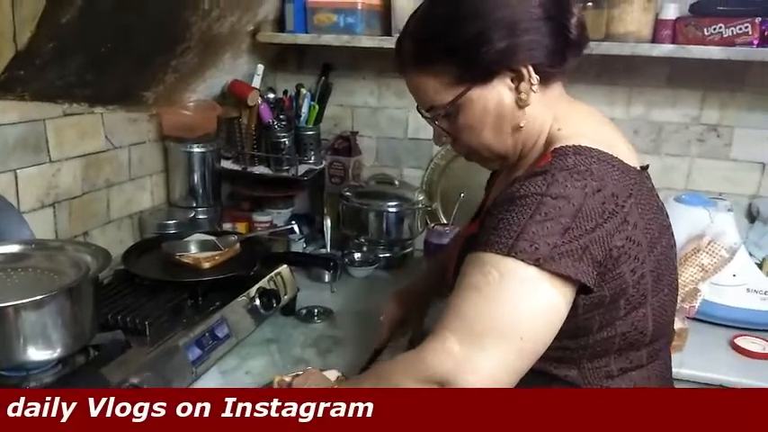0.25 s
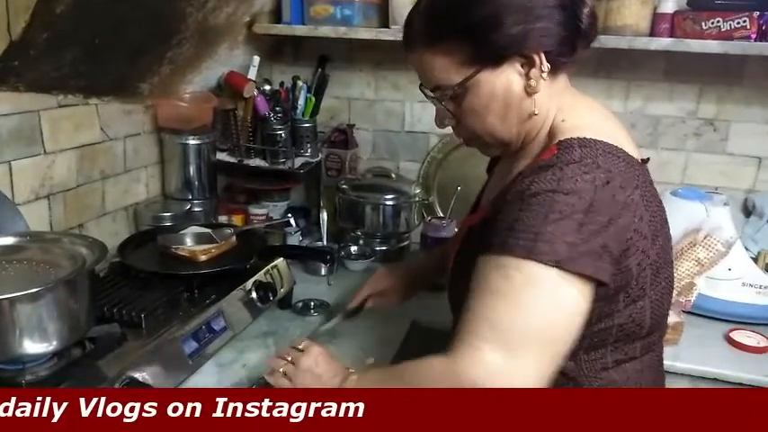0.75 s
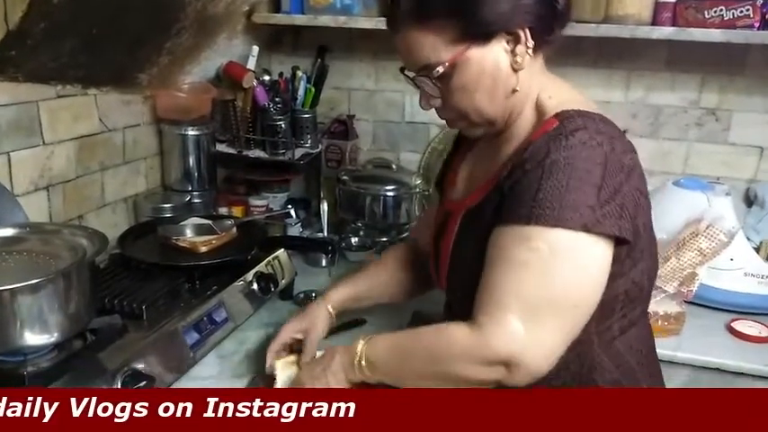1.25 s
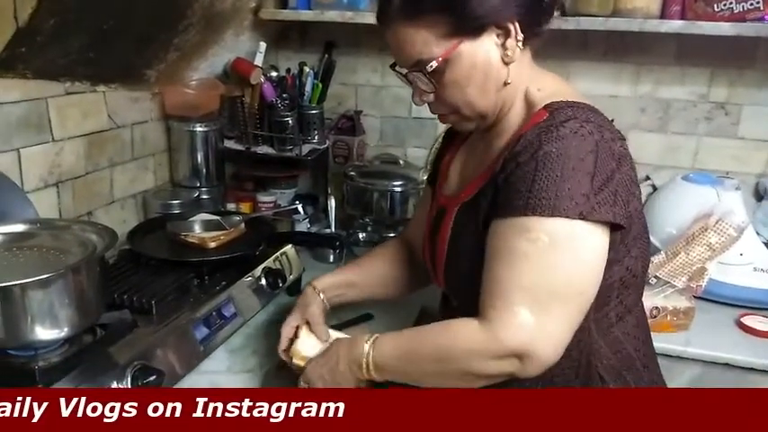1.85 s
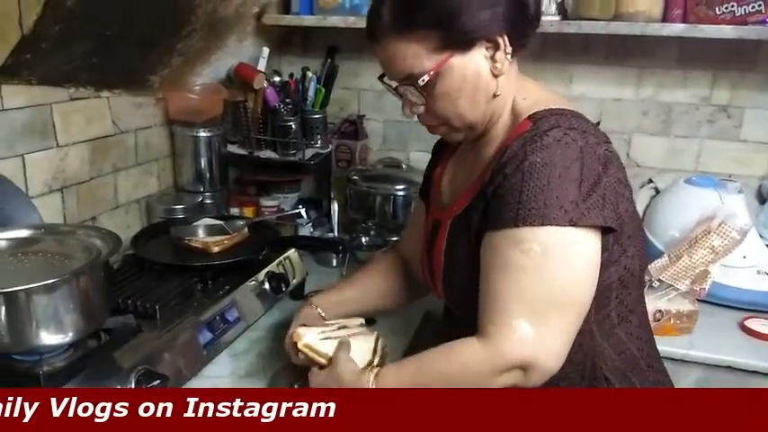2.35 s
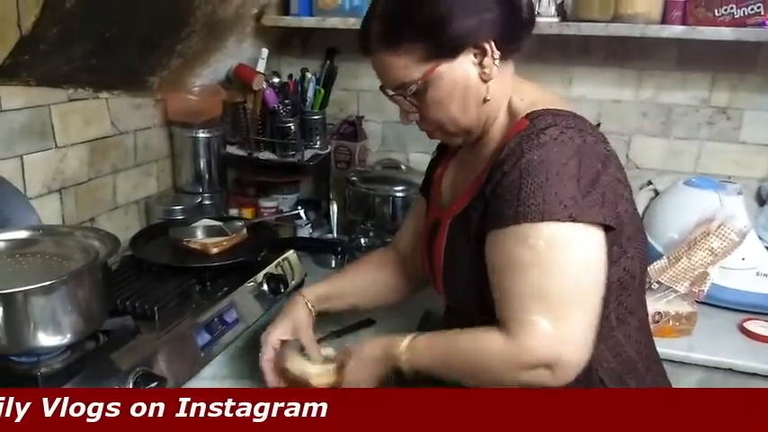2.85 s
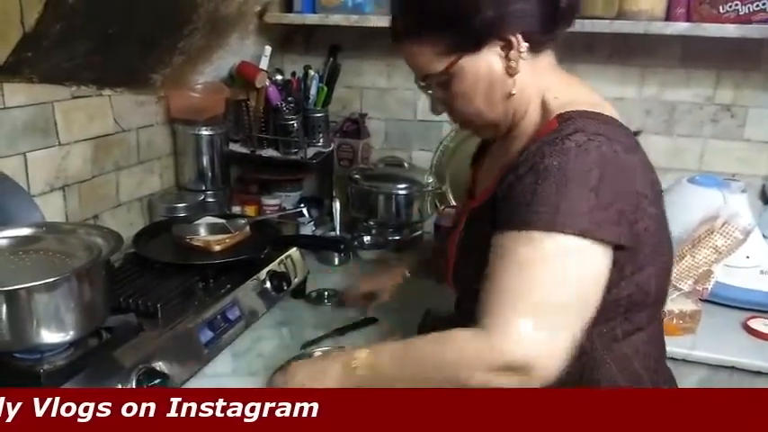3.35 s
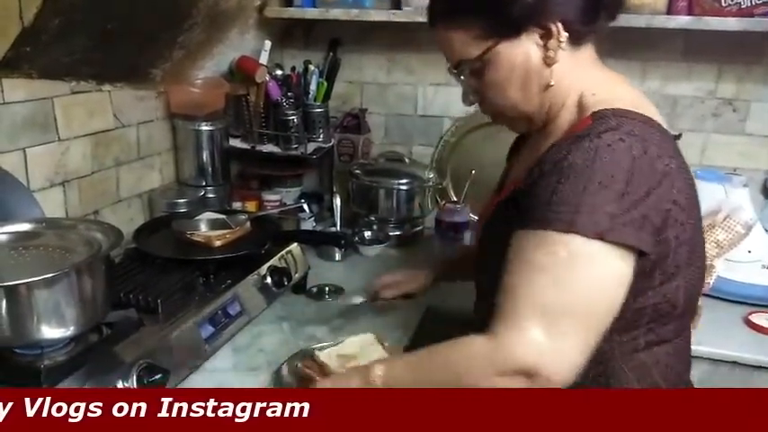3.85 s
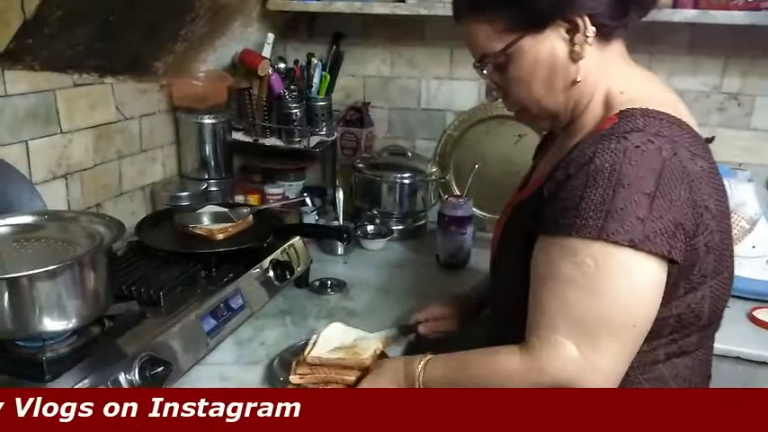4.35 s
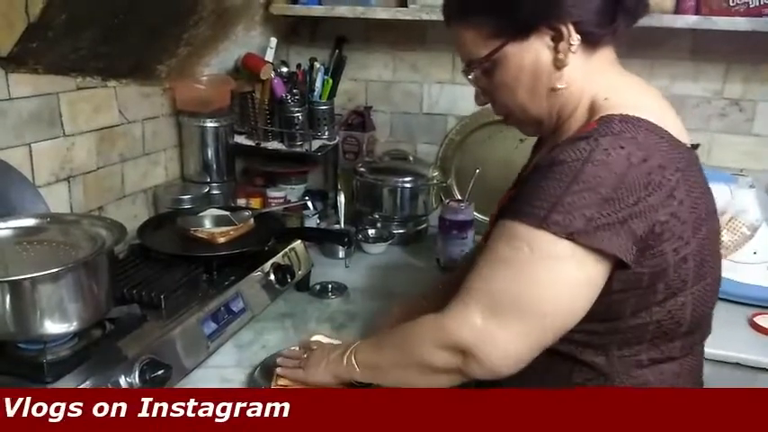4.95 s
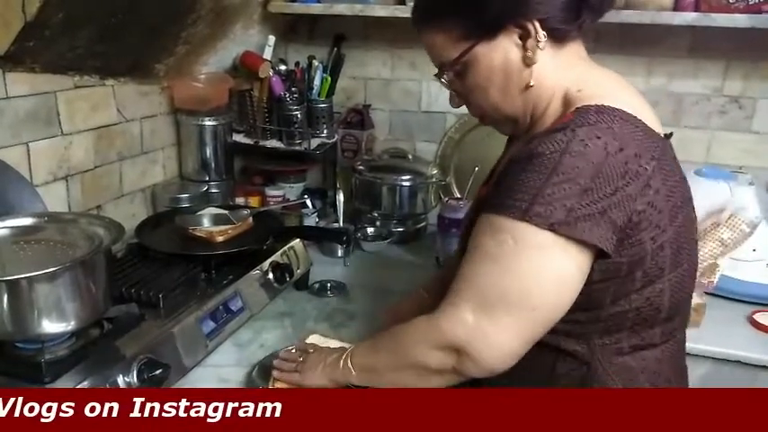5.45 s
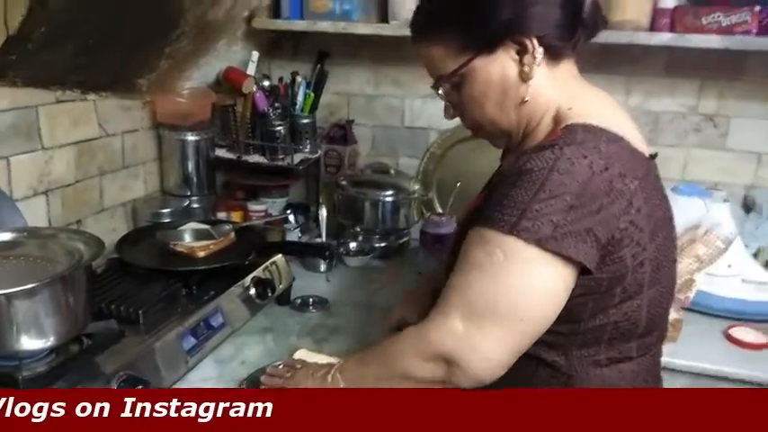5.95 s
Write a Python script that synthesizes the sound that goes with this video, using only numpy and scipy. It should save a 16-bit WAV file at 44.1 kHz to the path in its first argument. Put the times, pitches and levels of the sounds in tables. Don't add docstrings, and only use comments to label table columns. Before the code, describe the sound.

A knife scrapes and clanks through crisp toast on a steel plate in a small tiled kitchen, dull thuds pulsing through the wall.

```python
import sys
import numpy as np
from scipy import signal
from scipy.fft import rfft, irfft, next_fast_len
from scipy.io import wavfile
from scipy.ndimage import uniform_filter1d

SR = 44100
rng = np.random.default_rng(int(sys.argv[2]) if len(sys.argv) > 2 else 0)


def rack_gain(trim_db):
    fader = np.asarray(trim_db, float)
    return 10 ** (fader / 20)


def int16_out(signal):
    q = np.round(np.clip(np.atleast_2d(signal).T, -1, 1) * 32767)
    wavfile.write(sys.argv[1], SR, q.astype(np.int16))


N = 273330
T = np.arange(N) / SR
FAST = next_fast_len(N)


def evened(x):
    return x / np.sqrt(np.mean(x ** 2) + 1e-20)


def read(points, hz):
    f, value = np.transpose(points)
    return np.interp(np.log(hz + 1), np.log(f + 1), value)


def colour(x, points):
    gain = rack_gain(read(points, np.fft.rfftfreq(FAST, 1 / SR)))
    return irfft(rfft(x, FAST) * evened(gain), FAST)[..., :N]


def resonate(x, hz, width_hz):
    r = np.exp(-np.pi * width_hz / SR)
    pole = r * np.exp(2j * np.pi * hz / SR)
    return 2 * signal.lfilter([(1 - r) ** 1.5], [1, -2 * pole, pole ** 2], x).real


def spin(hz):
    return np.exp(2j * np.pi * np.cumsum(hz) / SR)


def add(mix, start_s, sound):
    part = mix[..., round(start_s * SR):][..., :sound.shape[-1]]
    part += sound[..., :part.shape[-1]]


def wash(points, patchy_db, size, bins, frames):
    hz = np.fft.rfftfreq(size, 1 / SR)
    a, b, c, d, patches = rng.standard_normal((N // (size // 4) + 5, len(hz), 5)).T
    patches = uniform_filter1d(patches, size=bins, axis=0)
    patches = evened(uniform_filter1d(patches, size=frames, axis=1))
    level_db = read(points, hz)[:, None] + patchy_db * patches
    z = np.array([a + 1j * b, c + 1j * d]) * rack_gain(level_db)
    return signal.istft(z, nperseg=size, noverlap=size - size // 4)[1][:, :N]


FINGERS = [
    [-68.5],
    [-84],
    [-69.5],
]
# peak_s, swell_s, plate_db, fizz_db, scuff_db
DRAGS = [(.1, 0.085, -65, 10, -9), (0.217, 0.13, -39.5, -12.5, -17.5), (0.326, 0.042, -37.5, -12.5, -11),
         (.44, 0.034, -41, -6, -14), (0.548, 0.067, -27, -12, -18), (0.859, 0.015, -31.5, -4, -11),
         (.95, 0.035, -25.5, -21, -1), (1.258, 0.04, -46.5, 2.5, -27), (2.581, 0.047, -26, -24, -17.5),
         (2.66, 0.055, -55, -6, -17), (2.911, 0.061, -33.5, -11.5, -11), (2.961, .05, -46.5, -7, -22),
         (3.199, 0.014, -48.5, -21, 6), (3.253, 0.072, -68, -25, 12), (4.378, 0.07, -43, -9, -30),
         (5.073, 0.18, -40.5, -9, -12.5), (5.21, 0.11, -46, -17, -10), (5.27, 0.086, -45.5, -6, -12),
         (5.4, 0.16, -42, -6.5, -12), (5.622, 0.14, -33.5, -16, -27), (5.69, 0.14, -42, -18, -14.5),
         (5.87, 0.08, -31, -11, -16), (5.91, 0.1, -33, -10, -29), (5.97, 0.11, -37.5, -3.5, -30)]
# start_s, peak_db, fizz_db, knock_db
CATCHES = [(0.4615, -11, -12.5, -26.5), (0.5327, -10, -5, -31), (0.839, -13, -7, -13),
           (0.9275, -8, -33, -13), (0.978, -15, -15, -22), (1.0079, -19.5, -24, -12),
           (1.031, -30.5, -28, -2.5), (1.0752, -19, -12.5, -12), (1.0994, -33, -18, -4),
           (1.248, -35.5, -9, -16), (2.5192, -31.5, -11.5, -15), (2.5625, -18.5, -17.5, -11.5),
           (3.0924, -50, -8, -4), (3.1302, -39.5, -35, -9), (3.178, -35.5, -6, -8),
           (5.7884, -27, -10.5, -25), (5.845, -15.5, -12, -41), (5.93, -16, -9.5, -24.5),
           (5.9505, -14, -7.5, -42)]
# start_s, peak_db, fizz_db, knock_db
STROKES = [(1.35, -38, -5, -9), (1.72, -54, 7.5, -12), (1.8502, -32, -11, -10.5), (2.8646, -34, -18, -26),
           (3.62, -59, 14.5, -10), (3.68, -59, 0, -12), (3.7693, -43.5, 1, -8), (3.8227, -40, -6, -23),
           (4.2872, -42, -5, -22), (4.4453, -39, -2.5, -33), (4.509, -37.5, -5.5, -23),
           (4.85, -42.5, -1, -19), (4.9771, -38.5, -0.5, -10), (5.02, -47, -15, -18),
           (5.3562, -26.5, -11, -28), (5.4496, -35, -2, -13), (5.5685, -33.5, -7, -8.5)]
# start_s, peak_db, fizz_db, knock_db
TICKS = [(.4348, -38, -12, -11), (.4605, -18, -13, -24), (.4677, -18, -19, -15), (.537, -5, -13, -28),
         (.8388, -15, -10, -16), (.852, -15, -4, -23), (.924, -15, -25, -4), (.9301, -11, -28, -8),
         (.944, -16, -25, -14), (.966, -28, -20, -5), (.982, -15, -16, -15), (1.0089, -27, -17, -15),
         (1.0289, -30, -22, -7), (2.5268, -35, -13, -21), (2.5407, -22, -17, -23), (2.5697, -29, -18, -7),
         (2.8815, -32, -14, -16), (2.91, -29, -17, 0), (3.1783, -44, -8, 2), (3.21, -48, -15, -10),
         (4.3332, -36, -10, -13), (4.3715, -39, -13, -19), (5.0361, -33, -12, -15), (5.06, -42, -16, -18),
         (5.1767, -36, -15, -15), (5.5679, -33, -5, -15), (5.6108, -39, -16, -23), (5.645, -22, -16, -27),
         (5.8472, -23, -17, -23), (5.9315, -23, -17, -25), (5.9525, -21, -12, -28)]


def blade_power():
    power = rack_gain(np.array(FINGERS)) ** 2 * np.ones(N)
    swell_db, drag_t60_s = 19.5, 0.18
    for peak_s, swell_s, db, fizz_db, scuff_db in DRAGS:
        rise_db = swell_db * (T - peak_s) / max(swell_s, .01)
        fall_db = -60 * (T - peak_s) / drag_t60_s
        layers_db = np.array([[0], [fizz_db], [scuff_db]])
        power = power + rack_gain(db - 5.0 + np.minimum(rise_db, fall_db) + layers_db) ** 2
    t = np.arange(SR // 3) / SR
    graze_s = 0.007
    graze = t[t < graze_s] / graze_s
    for rows, t60_s, rise_s in (CATCHES, 0.16, 0.0015), (STROKES, 0.19, 0.013), (TICKS, 0.027, 0.001):
        attack = np.minimum(t / (rise_s * np.array([[1], [2.5], [1]])), 1)
        for start_s, db, fizz_db, knock_db in rows:
            layers_db = np.array([[0], [fizz_db], [knock_db]])
            add(power, start_s - graze_s, (rack_gain(db - 15.0 + layers_db) * graze) ** 2)
            add(power, start_s, (attack * rack_gain(db - 10.0 - 60 * t / t60_s + layers_db)) ** 2)
    return power


# pitch_hz, width_hz, level_db
PLATE = [(2015, 50, -10.5), (2206, 35, -9.5), (2330, 38, -31), (2680, 58, -36), (2690, 59, -18),
         (2480, 32, -32), (2770, 200, -14), (3138, 120, -4.5), (4190, 70, -8), (4500, 140, -11.5)]
# time_s, pitch_hz
CONTACT = [(0, 2750), (.22, 2650), (.33, 3148), (.45, 2690), (.55, 2483), (.84, 2415), (.93, 2715),
           (1.17, 2588), (1.24, 3240), (1.4, 2743), (1.8, 3200), (2.45, 3204), (2.58, 2870), (2.9, 3020),
           (3.2, 2530), (4.3, 2784), (5.6, 2850), (5.95, 2586)]
# pitch_hz, level_db (per Hz)
BODY = [(880, -100), (1500, -38), (2230, -3.5), (2660, 2), (3300, -3), (4290, -7), (4790, -18.5),
        (5500, -15.5), (6200, -16.5), (7800, -29.5), (13200, -120)]
# pitch_hz, level_db (per Hz)
FIZZ = [(2940, -55), (4900, -5), (5600, -16.5), (6390, -3.5), (8130, -8), (9490, -5.5), (10900, -3),
        (12200, -3), (14600, -6), (15800, -14)]
# pitch_hz, level_db (per Hz)
SCUFF = [(150, -53), (250, -8), (460, -2), (538, -1.5), (823, -11.5), (955, -7.5), (1400, -5), (2000, -6),
         (2600, -14), (4400, -120)]


def knife():
    crumbs_per_s = 500
    crumbs = rack_gain(3.0 * rng.exponential(1, N)) * (rng.random(N) < crumbs_per_s / SR)
    grain = evened(5.3 + evened(uniform_filter1d(crumbs, size=150)))
    drive = np.sqrt(blade_power())[:, None] * grain
    modes = wash([(1, 0), (SR, 0)], patchy_db=4.0, size=1024, bins=2, frames=9)
    plate, fizz, scuff = drive * evened(modes)
    plain = drive[0] * rng.standard_normal((2, N))
    rung = sum(rack_gain(db) * resonate(plain, hz, max(width_hz, 15)) for hz, width_hz, db in PLATE)
    slide = spin(np.interp(T, *np.transpose(CONTACT)))
    contact = (slide * resonate(plain[::-1], 0, 380.0)).real
    body = rack_gain(-5.5) * colour(plate, BODY) + rack_gain(-11.0) * rung + rack_gain(-3.5) * contact
    return body + colour(fizz, FIZZ) + colour(scuff, SCUFF)


# start_s, pitch_hz, level_db, t60_s
CLINKS = [(.54, 4410, -30, .14), (.761, 4000, -55, .19), (.93, 330, -37, .25), (.93, 478, -32, .16),
          (.93, 968, -35, .12), (.93, 1405, -38, .12), (.93, 1650, -34, .14), (1.248, 3240, -44, .13),
          (2.87, 2950, -46, .3), (3.09, 700, -51, .07), (3.131, 2560, -52, .08), (3.179, 4050, -41, .1),
          (3.181, 1246, -41, .1), (3.18, 1763, -44, .2), (3.19, 2030, -46, .14), (3.19, 2210, -50, .1),
          (3.2, 4250, -47, .1), (3.235, 1620, -49, .15), (3.24, 1300, -52, .12),
          (.5425, 2507, -27, .17), (.5425, 2575, -24, .2), (.5425, 2646, -24, .2), (.5355, 2620, -15, .06),
         (.535, 2360, -30, .1), (.535, 2810, -28, .1), (.54, 2005, -33, .17), (1.791, 3252, -47, .45),
         (1.80, 3677, -55, .4), (2.52, 3010, -38, .12), (2.54, 2740, -38, .12), (2.54, 1443, -48, .1),
         (2.565, 2912, -30, .22), (2.565, 4090, -28, .09), (2.565, 4172, -29, .09), (2.565, 4242, -34, .2),
         (2.61, 1443, -51, .2), (2.62, 2136, -45, .9), (2.63, 2150, -54, .5), (6.1, 3330, -60, .25)]
# start_s, pitch_hz, level_db, t60_s
AFTERRING = [(.846, 2480, -35.5, .3), (.846, 2590, -36, .3), (.85, 2330, -34, 0.22), (.47, 2560, -34, .25),
             (.47, 3300, -31, 0.1), (.47, 3700, -36, 0.063), (.932, 1900, -27, 0.12), (.932, 2080, -25, .1),
             (.932, 3350, -32, .08), (.93, 3470, -38, 0.064), (5.955, 2640, -35, 0.26),
             (5.955, 2735, -35, .22), (5.96, 2540, -38, 0.21), (2.66, 3300, -50, .5),
             (2.69, 3800, -56, 0.35), (2.78, 3320, -60, 0.43), (.56, 2225, -37, 0.19),
             (4.29, 2790, -55, .15), (4.33, 2740, -53, .1), (4.368, 2690, -42, 0.085),
             (4.375, 2600, -51, .1), (4.43, 2950, -57, 0.27), (4.47, 3080, -53, .25),
             (4.5, 2910, -56, 0.28), (5.18, 2850, -51, .1), (5.21, 2460, -49, 0.11), (5.36, 2850, -43, .15),
             (2.9, 2215, -49, .1), (2.9, 693, -48.5, 0.068)]


def steel():
    out, t = np.zeros((2, N)), np.arange(SR) / SR
    hand = 1 / (1 + (t / .23) ** 10)
    for start_s, hz, db, t60_s in CLINKS + AFTERRING:
        attack = np.minimum(t / 0.00107, 1)
        add(out, start_s, rack_gain(db - 60 * t / t60_s) * hand * attack * np.sin(2 * np.pi * hz * t))
    return out


# time_s, level_db
TREMBLE = [
    [(1.8, -62), (1.872, -45.5), (2.086, -65.5), (2.194, -54), (2.48, -54.5), (2.574, -44), (2.624, -47.5),
     (2.82, -63.5), (3.0, -60)],
    [(4.25, -66), (4.292, -60), (4.858, -56.5), (4.898, -60.5), (5.074, -52), (5.112, -63), (5.3, -59)],
]
# pitch_hz, width_hz, level_db
RINGS = [
    [(2870, 47, -6), (3263, 67, 5), (3350, 56, -2), (3660, 55, -1.5), (3960, 100, -4.5), (4270, 61, -6.5)],
    [(2870, 63, -13), (3140, 32, -1), (3300, 74, 0), (3524, 90, 3)],
]


def trembling_plate():
    out = np.zeros((2, N))
    drift_hz = 16
    for rows, rings in zip(TREMBLE, RINGS):
        time_s, level_db = np.transpose(rows)
        shake = rng.standard_normal((2, N)) * rack_gain(np.interp(T, time_s, level_db, -150, -150) - 7.0)
        for hz, width_hz, db in rings:
            fits = np.interp(T, np.arange(0, 7, .04), rng.standard_normal(175))
            turn = spin(hz + drift_hz * fits[::-1])
            still = resonate(shake * turn.real, 0, width_hz) + 1j * resonate(shake * turn.imag, 0, width_hz)
            out += rack_gain(db + 2.8 * fits) * (turn * still).real
    return out


# start_s, peak_db, boom_db (over the knock), bright_db
BLOWS = [(0.601, -49.5, -3.5, -23), (1.051, -43, 0.5, -9), (1.557, -50, 5, -32), (2.033, -41, -1.5, -24),
         (2.474, -40.5, 3, -40), (2.951, -31, -7, -25.5), (3.440, -32, -6, -30), (3.92, -29, -8.5, -33),
         (4.433, -43.5, 4.5, -29), (4.942, -39, -5, -13.5), (5.437, -29.5, -8.5, -32),
         (5.903, -41, 2.5, -16)]
# pitch_hz, width_hz, level_db
WALL = [(213, 83, -10), (261, 51, -1), (305.7, 31.6, 0.5), (340.3, 39, -2.5), (413.6, 11.3, -5.5),
        (432, 46, -14)]
# pitch_hz, level_db, t60_s
BOOM = [(118.2, 2.5, 0.47), (128.13, 4.5, 0.75), (174.9, 1, 0.43)]


def blows():
    out, t = np.zeros(N), np.arange(SR // 2) / SR
    settle = rack_gain(-20.0) + 1 / (1 + (t / 0.13) ** 20)
    swell = 0.38 * np.exp(-((t - .02) / 0.017) ** 2) + np.minimum(t / 0.094, 1) ** 3
    drone_shape = np.minimum(t / 0.014, 1) * (1 - 1.2 * np.exp(-((t - .12) / 0.028) ** 2))
    detune = .025
    shared = rng.standard_normal(len(t))
    for start_s, db, boom_db, bright_db in BLOWS:
        own = rng.standard_normal((2, len(t)))
        knock = 0
        for hz, width_hz, mode_db in WALL:
            band = resonate(shared + 0.51 * own[0], hz, width_hz)
            fade_db = hz / 300 * 109.0 * t
            knock = knock + rack_gain(mode_db - fade_db) * band / np.std(band[:SR // 8])
        edge = resonate(own[1], 645.0, 300.0) * rack_gain(-300. * t) * np.minimum(t / 0.0084, 1)
        boom = 0
        for (hz, mode_db, t60_s), jog in zip(BOOM, own[1]):
            phase = 2 * np.pi * hz * (1 + detune * jog) * (t - .02) + 0.99 * jog
            boom = boom + rack_gain(mode_db + 1.5 * jog - 60 * t / t60_s) * np.cos(phase)
        sound = rack_gain(-9.) * knock * np.minimum(t / 0.0018, 1)
        sound = sound + rack_gain(boom_db + 4.5) * swell * boom + rack_gain(bright_db + 4.5) * edge
        lowest_hz = 81. * (1 + detune * own[0, 1])
        drone = rack_gain(boom_db - 13.5) * drone_shape * np.sin(2 * np.pi * (lowest_hz * t + own[0, 0]))
        add(out, start_s - .001, rack_gain(db) * (settle * sound + drone) * np.cos(np.pi * t) ** 2)
    out = signal.lfilter(*signal.butter(2, 100 / SR, "high"), out)
    return np.array([out, out])


# pitch_hz, level_db (per Hz)
RUMBLE = [(20, -43), (60, -30), (91, 11.5), (114, 0), (203, 2.5), (275, -8), (463, -13.5), (600, -42),
          (780, -67), (1320, -120)]


def rumble():
    start_s, peak_db, boom_db = np.array(BLOWS)[:, :3].T[..., None]
    late = np.maximum(T - start_s, 0) / 0.095
    swells = rack_gain(peak_db + boom_db - 18) * late * np.exp(1 - late)
    noise = evened(wash(RUMBLE, patchy_db=6.5, size=2048, bins=3, frames=5))
    return noise * (rack_gain(-60.5) + swells.sum(0))


# pitch_hz, level_db (per Hz)
FLAME = [(180, -58), (300, -2), (469, -5.5), (839, -6.5), (1950, -12), (2770, -10), (4260, -9.5),
         (4710, -14), (8550, -30), (11700, -15.5), (14800, -22), (15800, -14)]


def flame():
    return rack_gain(-64.0) * evened(wash(FLAME, patchy_db=5.0, size=1024, bins=5, frames=8))


# pitch_hz, level_db (per Hz)
HUM = [(15, -100), (28, -90), (42, -101), (52, -104), (72, -86), (120, -77), (250, -88.5), (500, -110)]


def hum():
    deep = rack_gain(-12.0) * np.sqrt(SR) * wash(HUM, patchy_db=-4.5, size=4096, bins=2, frames=6) / 40
    strength = 1 + 0.6 * np.sin(2 * np.pi * 0.68 * T)
    motor = np.sin(2 * np.pi * 32.5 * T + 2.5 * np.sin(2 * np.pi * 0.466 * T))
    return deep + rack_gain(-69.0) * strength * motor


# pitch_hz, t60_s
KITCHEN = [(200, 0.3), (1000, 0.17), (3000, 0.099), (8000, 0.19), (15000, 0.057)]


def kitchen(x):
    taps = np.zeros((2, SR // 2))
    at = np.arange(150, SR // 2 - 20, 20)
    at = at + rng.integers(0, 20, (2, len(at)))
    np.put_along_axis(taps, at, rng.choice([-1., 1.], at.shape), 1)
    hz, t, z = signal.stft(taps, SR, nperseg=256)
    fade = rack_gain(-60 * t / read(KITCHEN, hz)[:, None])
    tail = signal.istft(z * fade, SR, nperseg=256)[1]
    return signal.oaconvolve(x, tail / np.linalg.norm(tail[0]), axes=1)[:, :N]


def scene():
    near = knife() + steel() + trembling_plate()
    far = blows()
    wet = kitchen(rack_gain(-12.5) * near + rack_gain(-6.5) * far)
    return near + far + wet + rumble() + hum() + flame()


def band_limit(x):
    return signal.sosfilt(signal.butter(12, 16500, fs=SR, output="sos"), x)


# pitch_hz, likeness (1 = the same)
SAME = [(60, .97), (500, 0.94), (800, 0.55), (1400, 0.073), (2000, -0.15), (6000, 0.11)]
# pitch_hz, level_db
SHADE = [(500, -0.7), (1500, .5), (3000, 7), (5000, -1.5), (8000, 18.5), (13000, 7)]


def record(dry):
    hz = np.fft.rfftfreq(FAST, 1 / SR)
    left, other = rfft(dry, FAST) * (hz < 15700)
    same = np.clip(read(SAME, hz), -1, 1)
    lean = rack_gain(read(SHADE, hz) / 2)
    right = same * left + np.sqrt(1 - same ** 2) * other * 1j
    pair = np.array([left * lean, right / lean]) * 2 / np.hypot(lean, 1 / lean)
    return band_limit(irfft(pair, FAST)[:, :N])


dry = scene()
out = record(dry)
int16_out(out)
```